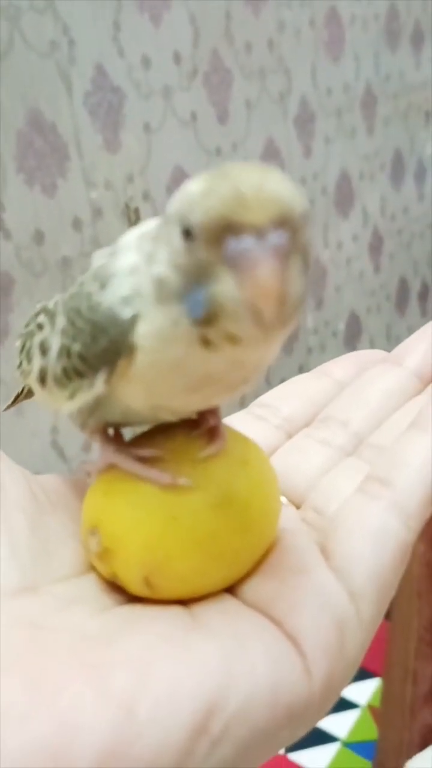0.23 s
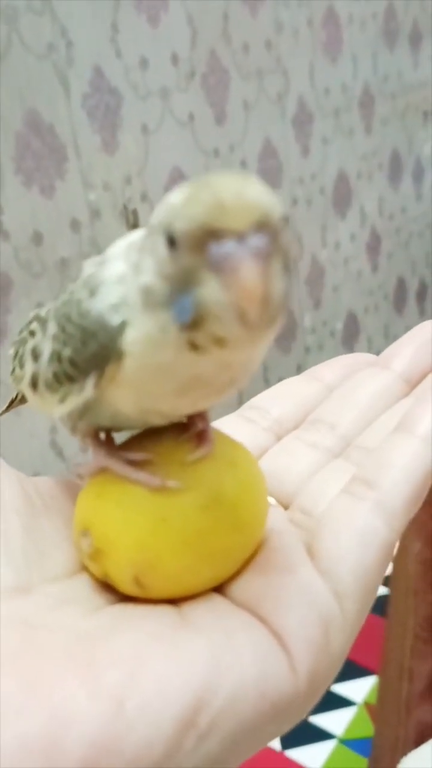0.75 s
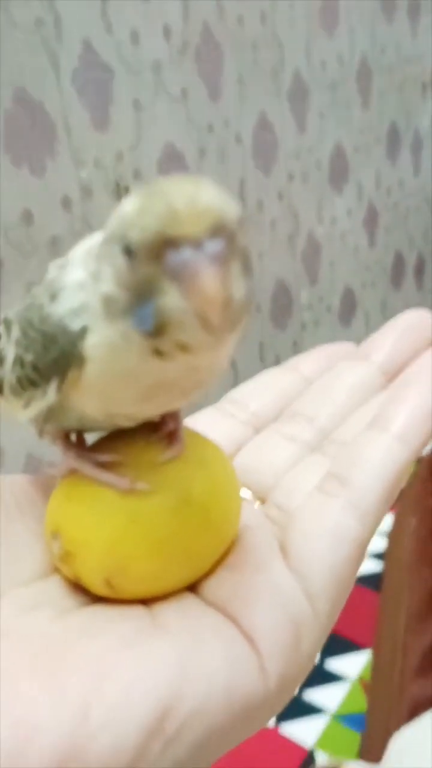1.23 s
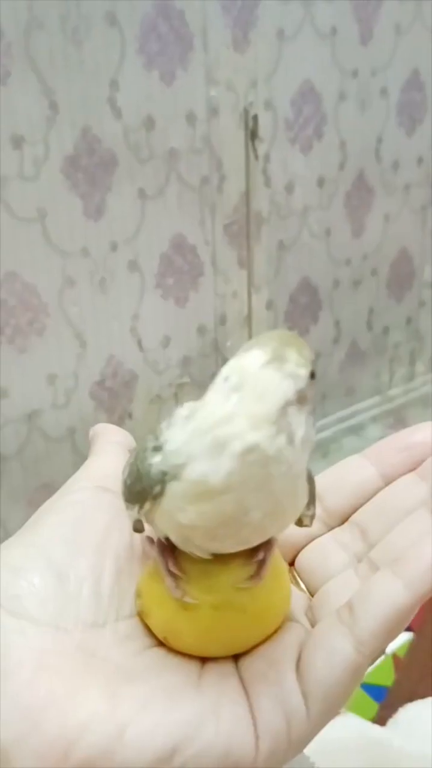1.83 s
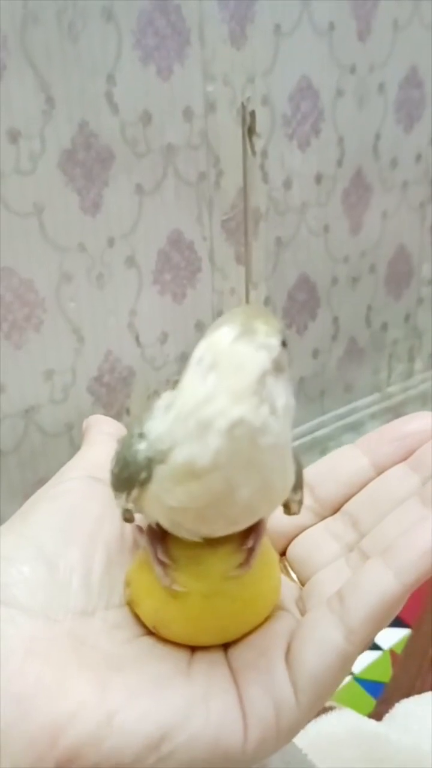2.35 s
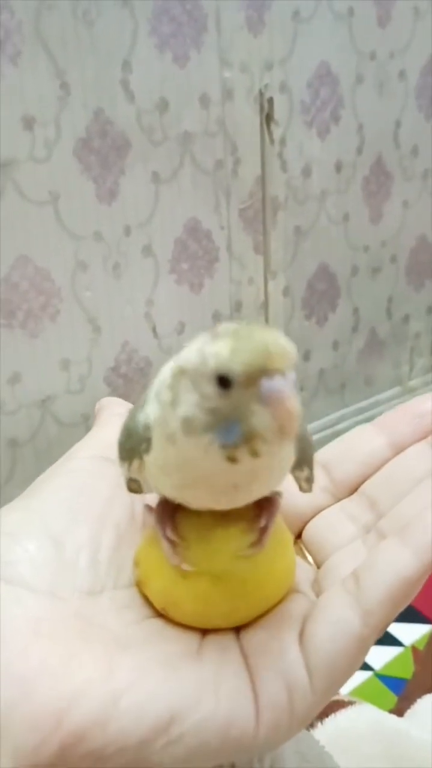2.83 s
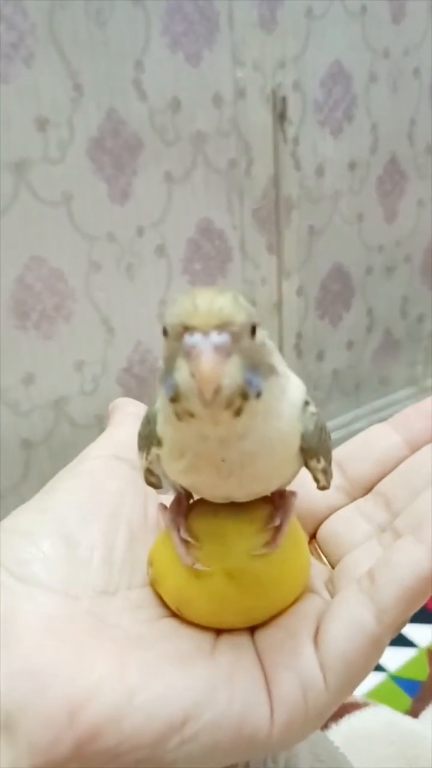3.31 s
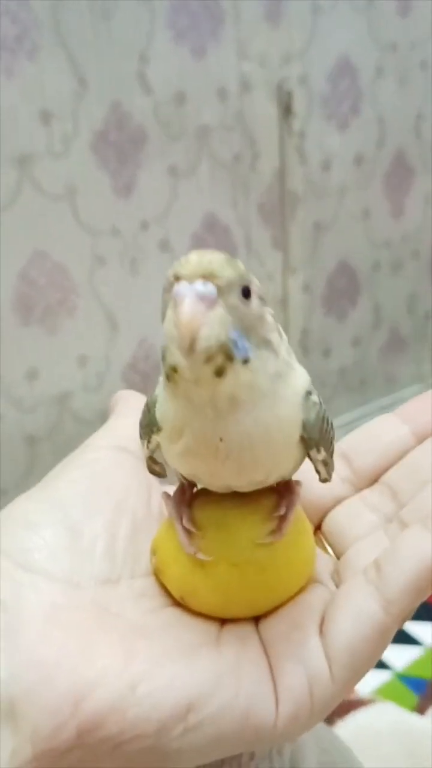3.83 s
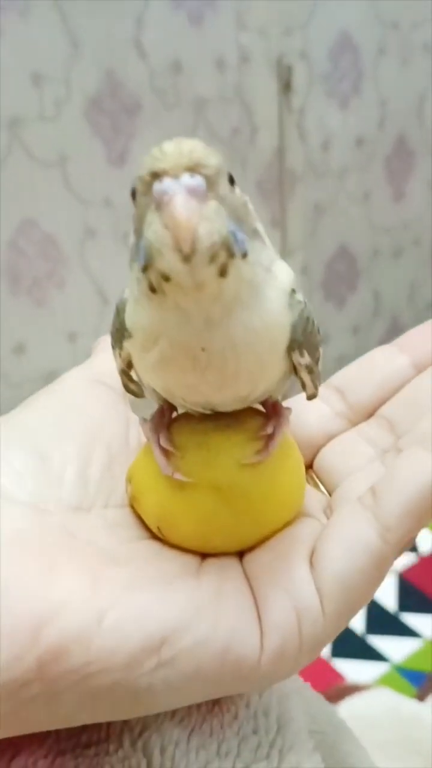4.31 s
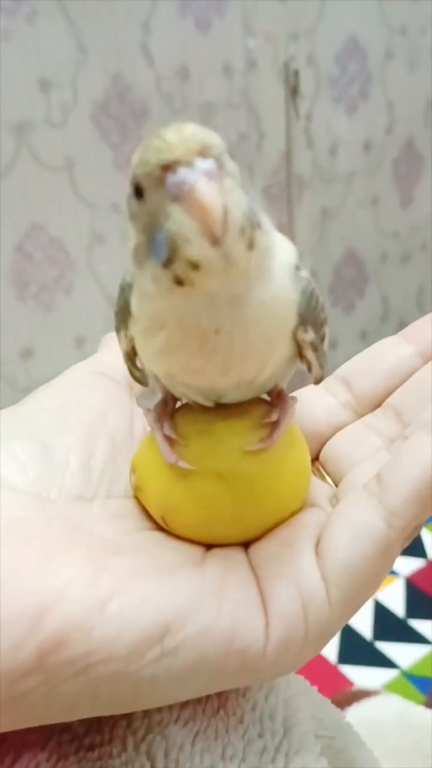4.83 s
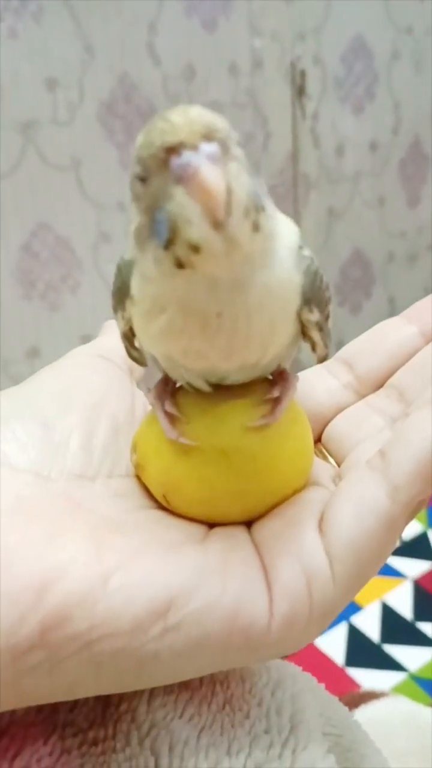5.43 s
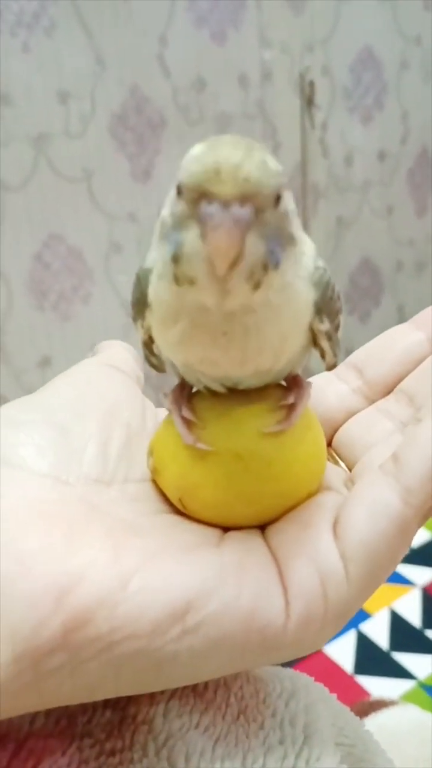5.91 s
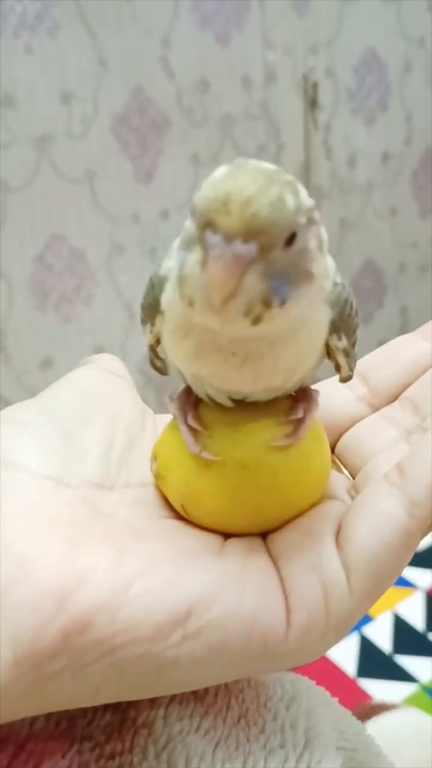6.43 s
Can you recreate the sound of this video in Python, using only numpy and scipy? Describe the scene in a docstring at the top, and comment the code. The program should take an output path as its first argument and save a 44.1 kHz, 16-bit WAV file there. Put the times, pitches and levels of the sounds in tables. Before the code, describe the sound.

A young parakeet gives high, raspy chirps over and over, close up in a small room, with other birds calling faintly further off.

```python
"""A young parakeet on a hand gives ten long raspy chirps close to a phone with two microphone ports. Each is an
unsteady whistle with overtones, half-pitch rasp and breath; a thin 14 kHz hiss sounds while each lasts. Small-
room tone and faint mains buzz run from the start. Birds call further off from 0.3 s. At 1.25 s come a faint
tick and the first of six soft rustles. All sound drops out from 2.8 to 3.1 s. At 4.9 s another bird gives a
nasal squawk; the chirps go on to the end."""
import sys
import numpy as np
from scipy import signal
from scipy.fft import rfft, irfft, next_fast_len
from scipy.io import wavfile
from scipy.ndimage import uniform_filter1d

SR = 44100
rng = np.random.default_rng(int(sys.argv[2]) if len(sys.argv) > 2 else 0)


def store_pcm(level_fs):
    """Save levels as 16-bit WAV."""
    pcm = np.round(np.clip(level_fs, -1, 1) * 32767).astype(np.int16)
    wavfile.write(sys.argv[1], SR, np.atleast_2d(pcm).T)


N = 293706

# Contours, one table a chirp. Each row: time in seconds, left-port whistle in dB, pitch in Hz,
# octave in dB re whistle.
CHIRPS = [
    [(0.0, -18.5, 2876, -9.5), (0.016, -19, 2585, -11.5), (0.03, -20.5, 2980, -8), (0.05, -21, 3040, -6),
     (0.144, -25.5, 3200, -2), (0.194, -18.5, 2968, -11.5), (0.225, -19.5, 3041, -5),
     (0.28, -17, 2930, -14.5)],
    [(0.645, -23.5, 3210, -4), (0.666, -27.5, 3090, -17), (0.714, -23.5, 3076, -9),
     (0.808, -19.5, 2958, -7.5), (0.874, -25, 3180, -4.5), (0.948, -16, 2940, -15),
     (0.97, -18.5, 3082, -12), (0.992, -20, 2856, -24)],
    [(1.43, -35, 3434, -15), (1.488, -24, 3070, -14), (1.525, -24, 2960, -9.5), (1.544, -19.5, 2794, -5.5),
     (1.675, -31.5, 3586, -29.5), (1.689, -27, 3350, -25), (1.732, -24, 3063, -22), (1.805, -26, 3373, -18),
     (1.849, -25.5, 3470, -28), (1.865, -29.5, 3090, -30)],
    [(2.34, -32.5, 3560, -23), (2.361, -35, 3315, -18.5), (2.477, -34.5, 3470, -20.5),
     (2.513, -24, 2960, -19), (2.541, -30.5, 3450, -17), (2.643, -19, 2846, -4), (2.695, -24.5, 3257, -18),
     (2.715, -19.5, 2925, -4), (2.79, -23, 3070, -8.5)],
    [(3.108, -28, 3215, -11), (3.123, -28, 3187, -4), (3.142, -29.5, 3250, -6.5), (3.176, -22.5, 3453, -18),
     (3.192, -22, 3154, -2.5)],
    [(3.485, -32, 3285, -4.5), (3.546, -25, 2998, -18.5), (3.586, -31.5, 3360, -14),
     (3.599, -25, 2997, -11), (3.627, -26.5, 3276, -8.5), (3.697, -27.5, 3193, -8.5),
     (3.774, -24.5, 3340, 1), (3.787, -24.5, 3140, -33), (3.825, -25, 3440, -2)],
    [(4.277, -27.5, 3017, -13), (4.326, -31.5, 3327, -16), (4.344, -24, 2955, -26),
     (4.38, -29.5, 3050, -15), (4.424, -29, 3290, -30), (4.44, -28, 3006, -9), (4.465, -25.5, 3110, -15),
     (4.58, -26.5, 3310, -19.5)],
    [(4.868, -27.5, 3018, -9), (4.953, -26.5, 3102, -11.5), (5.015, -19, 2970, -12), (5.054, -23, 3060, -5),
     (5.107, -23, 3028, -5.5), (5.116, -24.5, 3237, -1.5), (5.163, -25, 3350, -20),
     (5.176, -23.5, 3217, -8.5), (5.197, -22.5, 3350, -23), (5.212, -21.5, 3220, -5.5)],
    [(5.617, -27.5, 3156, -15), (5.664, -27, 3113, -12), (5.68, -22.5, 2974, -16),
     (5.693, -25, 3160, -11.5), (5.734, -17.5, 2634, -9), (5.748, -18.5, 2990, -7.5),
     (5.768, -22.5, 3048, -3.5), (5.849, -24, 3136, -3.5), (5.998, -17, 2953, -11.5)],
    [(6.363, -25.5, 3248, -6.5), (6.383, -23.5, 3083, -16), (6.396, -32, 3390, -15),
     (6.409, -23.5, 3190, -21), (6.442, -24, 3030, -8), (6.556, -21, 3007, -8), (6.592, -23.5, 3137, -9),
     (6.66, -18.5, 3040, -11)],
]
# Voice and head direction per chirp. Each row: base wobble in Hz rms, third partial in dB, rasp in dB
# re whistle, breath and hiss in dB, opening catch, end slide and end burst in dB re whistle,
# left-right in dB, right-port phase of whistle and of octave in radians.
VOICES = [(30, -45.5, -44, -53, -14, -5, -15.5, 3, 2.27, 1.7),
          (44, -49, -51.5, -53.5, -7.5, -13, -15, 1, 2.92, 2.53),
          (73.6, -52.5, -32, -51, 3.5, 1, -23.5, 1, 2.74, 2),
          (86.7, -55, -30.5, -53, -2, -14, -31, 5, 1.8, 1.91),
          (50.9, -53, -49.5, -77, -17, -4, -16, -1, 2.7, 3.12),
          (62, -52.5, -33.5, -58.5, -4, -1, -8.5, 0.5, 2.77, 3.5),
          (67.7, -55.5, -32.5, -59.5, -10, -3.5, -15.5, 1.5, 2.86, 2.37),
          (53, -50.5, -36, -55.5, -18.5, 2.5, -9.5, -0.5, 2.68, 2.4),
          (37.7, -46.5, -36, -56.5, -7, -1.5, -16, 3.5, 2.25, 1.76),
          (44.1, -50.5, -62, -57.5, -1, 2, -61, 2, 3.02, 2.2)]
# Largest voice slips. Each row: time in seconds, pitch jump in Hz, level change in dB.
SLIPS = [(0.105, -152, 1), (0.679, 374, -2), (0.839, 170.5, -2.5), (0.919, 206, -3), (0.968, 237.5, -5.5),
         (1.468, 188, -20), (1.521, 225, -10), (1.747, 304, -5), (1.799, -250, 4.5), (2.374, 345, 5.5),
         (2.394, 329.5, 7), (2.417, 221, -5), (2.467, -400, 4), (2.489, -339, 5.5), (2.546, -275, 6),
         (2.612, 249, 1), (2.66, 208, -4), (2.691, -435, 6.5), (2.707, -256, 2.5), (2.75, 190, -4),
         (2.774, -178, 3.5), (3.117, -215, 6), (3.187, 82, -12.5), (3.515, 340, 0), (3.533, 285, -3),
         (3.612, 183, -10), (3.697, -208, 2), (3.745, -242, 4), (3.765, -214, 2), (3.784, -248, 9.5),
         (4.313, -145, 0.5), (4.357, 153, -1), (4.38, 145, -1.5), (4.418, -222, 3), (4.464, 209, -3),
         (4.496, 196, 0), (4.542, 224, 1), (4.912, -298, -2), (5.664, 162, -2), (5.927, -102, 3.5),
         (6.557, 182, -5), (6.609, 139, 1)]
# An echo off the hand shades the ports. Each row: pitch in Hz, left-right change in dB.
HAND_SHADE = [(2600, 11), (2775, 11), (2925, 6.5), (3075, 2.5), (3225, -1.5), (3375, -4.5), (3550, -2.5)]
# Same echo. Each row: pitch in Hz, right-port phase change in radians.
HAND_PHASE = [(2600, -0.15), (2775, -0.13), (2925, 0.25), (3075, -0.05), (3225, -0.057), (3375, -0.23),
              (3550, 0.85)]
# Distant calls. Each row: start and length in seconds, peak position 0-1, peak in dB,
# first pitch, last pitch and smear in Hz, left-right in dB.
FAR_CALLS = [(0.328, 0.098, 0.2, -57, 4450, 4250, 400, -1), (0.421, 0.17, 0.03, -57, 3270, 3100, 487, -1),
             (1.251, .2, 0.68, -45.5, 1770, 2797, 350, -2), (1.249, 0.25, 0.67, -59, 1662, 1730, 200, -13),
             (2.11, 0.13, 0.14, -57.5, 2043, 1817, 132, -6), (2.172, 0.071, 0.43, -62, 1363, 1350, 100, -8),
             (3.295, 0.19, 0.78, -54, 3860, 3760, 135, 0), (3.357, 0.17, 0.56, -53, 4970, 4940, 710, 1),
             (3.857, 0.32, 0.25, -48.5, 4130, 4140, 454, -1),
             (3.87, 0.35, 0.42, -47.5, 4770, 4850, 239.4, 0.5), (4.031, 0.42, .1, -60.5, 1860, 1866, 60, 0),
             (4.203, 0.23, 0.7, -55, 1865, 1940, 80, 0), (4.203, .1, 0.82, -50, 2006, 2660, 274, 0),
             (5.258, 0.13, .5, -62.5, 2510, 2380, 80, 1), (5.337, 0.14, 0.23, -71, 2133, 2140, 60, -20)]
# Squawk contour. Each row: time in seconds, level in dB, pitch in Hz.
SQUAWK = [(4.875, -82, 1225), (4.894, -32.5, 1209), (4.924, -37, 1228), (4.945, -44.5, 1223),
          (5.022, -42.5, 1197), (5.07, -53.5, 1152)]
# Squawk harmonics. Each row: pitch multiple, gain in dB.
SQUAWK_PARTIALS = [(1, -1), (2, 3), (3, -10), (4, -8.5)]
# Rustles. Each row: start and length in seconds, midpoint level in dB.
RUSTLES = [(1.257, 0.26, -46.5), (2.1, 0.19, -82), (3.372, 0.15, -58.5), (3.85, 0.27, -65.5),
           (4.183, 0.105, -57), (5.244, .2, -77)]
# Mains overtones. Each row: frequency in Hz, level in dB rms.
BUZZ = [(100.7, -76.5), (201.4, -77.5), (906, -80), (1007, -70.5), (1108, -81), (1611, -76), (1712, -85.5),
        (1913, -92), (2014, -79.5)]
# Breath, plus a thin 14 kHz hiss during the chirps. Each row: frequency in Hz, relative density in dB.
BREATH_AND_HISS_SPECTRUM = [(30, -10.5), (100, 1), (500, 2), (900, -4.5), (2000, 1), (3500, -8.5),
                            (4600, -30), (7600, -25), (11000, -29.5), (14200, -13.5)]
# Other noise spectra. Each row: frequency in Hz, relative density in dB.
HOARSE_SPECTRUM = [(300, -27.5), (1200, -15.5), (2200, -2), (3300, -6), (4200, -13.5), (5800, 2),
                   (7500, -11.5), (14000, -23)]
RUSTLE_SPECTRUM = [(300, -7), (1500, -10), (3000, 3.5), (6000, -21), (9000, -13), (14000, -39)]
ROOM_TONE_SPECTRUM = [(15, -52), (25, -6), (317, -20), (500, -14.5), (766, -23), (1000, -21.5),
                      (1500, -21.5), (1660, -17.5), (2420, -22.5), (3520, -22), (4600, -29), (13800, -38),
                      (14900, -31)]
# Noise likeness at the two ports. Each row: frequency in Hz, correlation 0-1.
PORT_LIKENESS = [(60, 0.32), (300, 0.345), (700, 0.44), (1400, 0.0057), (14000, 0.013)]
# Room decay. Each row: frequency in Hz, T60 in seconds.
ROOM_T60 = [(1000, 0.1), (2800, 0.25), (6000, .24), (9000, .25), (14000, 0.1)]

EASY_HZ = 3100  # the voice strains above this pitch
WOBBLE_PER_HZ, WOBBLE_MIN_HZ = .13, 24.2
RASP_DB_PER_HZ, RASP_EDGE_DB, RASP_EDGE_S = .0352, 13.5, .032
CATCH_HZ, CATCH_S, CATCH_RISE_S = 3950, .0089, .011
SLIDE_HZ, SLIDE_S = 880, .00902
SLIP_WIDTH_S, SLIP_GAP_S, SLIP_HZ, SLIP_DB = .0031, .024, 85, 1.5
TRAIL_DB, TRAIL_DB_PER_S = -16.5, 220
BREATH_SWELL_DB, BREATH_HOLD_S, BREATH_DB_PER_S = 2.5, .033, 891
PORT_DELAY_SAMPLES = 11  # the right port hears the parakeet later
DROPOUT_START_S, DROPOUT_END_S, CUTOFF_HZ = 2.7868, 3.1005, 14850


def parakeet():
    """All chirps with their breath, hoarse air and room echoes, plus a thin hiss that sounds with them."""
    voice, air = np.zeros((2, N)), np.zeros((2, N))
    for contour, traits in zip(CHIRPS, VOICES):
        start_s, ports, air_gains = chirp(contour, *traits)
        add(voice, start_s, ports)
        add(air, start_s, air_gains)
    near = voice + air[0] * hiss(BREATH_AND_HISS_SPECTRUM, patchy_db=4)
    near += air[1] * hiss(HOARSE_SPECTRUM, patchy_db=4)
    return near + amp(-16) * room(near)


def chirp(contour, wobble_hz, third_db, rasp_db, breath_db, catch_db, slide_db, burst_db,
          pan_db, whistle_rad, octave_rad):
    """One unsteady whistle, roughened by strain. Returns start time, both ports and two noise gains."""
    times_s, *columns = np.transpose(contour)
    start_s, end_s = times_s[0], times_s[-1]
    t = np.arange(start_s - .03, end_s + .16, 1 / SR)
    db, hz, octave_db = (np.interp(t, times_s, c) for c in columns)
    strain_hz, effort_db = hz - EASY_HZ, db - db.mean()
    wobble_hz = np.maximum(wobble_hz + WOBBLE_PER_HZ * strain_hz, WOBBLE_MIN_HZ)
    rough = np.clip(wobble_hz / 120, 0, 1)
    third_db = third_db + effort_db - db - 25 * (t < start_s)  # now re whistle
    burst = amp(db[-1] + burst_db) * end_burst(t - end_s)

    # The voice catches on a thin high note, and slides down as the air runs out.
    before = np.clip((start_s - t) / .0044, 0, 1)
    after = np.clip((t - end_s) / SLIDE_S, 0, 3)
    hz += before * (CATCH_HZ + 120 * wander(len(t), 51, 310) - hz)
    hz -= SLIDE_HZ * np.minimum(after, 1) ** 1.545
    db += before * (catch_db - 30 * np.clip((start_s - CATCH_S - t) / CATCH_RISE_S, 0, 2))
    db += slide_db * np.minimum(4 * after, 1) - 14 * after ** 3

    slip_hz, slip_db = slips(t, start_s, end_s, strain_hz)
    tremor_hz = wobble_hz * wander(len(t), 42.3, 145)
    slip_db -= 2 * np.tanh(tremor_hz / 120)  # the whistle sounds quieter on upward pitch swings
    sag_db = -(1 + 3 * rough) * (wander(len(t), 41.1, 158) ** 2 - .4) / 2

    # Spells of strong-weak beating in the folds fill in the half-pitch lines.
    to_edge_s = np.maximum(np.minimum(t - start_s, end_s - t), 0)
    rasp_db += RASP_DB_PER_HZ * strain_hz + RASP_EDGE_DB * np.exp(-to_edge_s / RASP_EDGE_S)
    rasp_db += 3 * wander(len(t), 9.3, 48) - 30 * before
    # Each row: multiple, gain in dB, right-port phase in radians, flutter in dB, smear in radians.
    partials = [(1, .008, whistle_rad, -1, .048),
                (2, octave_db - 30 * before ** .54, octave_rad, 3.5, .2),
                (3, third_db, -2, 1, .8),
                (4, third_db - 7.5, .04, -1.5, .8),
                (.5, rasp_db - 10, 2.5, -4.5, .68),
                (1.5, rasp_db - .5, 4, 1.5, .92),
                (2.2, rasp_db - 12.5, 2.74, 5.5, .57)]
    ports = whistle(hz + slip_hz + tremor_hz, db + sag_db + slip_db, partials, rough, pan_db)

    puff = amp(breath_db + .45 * effort_db) * breath(t, start_s, end_s, before, after)
    hoarse = amp(db - 49 + 20 * rough)  # an unsteady voice leaks air
    gusts = amp(2 * wander(len(t), 15, 149.8))
    fade = np.clip(np.minimum(t - t[0], t[-1] - t) / .0016, 0, 1)
    return t[0], ports * fade, np.array([puff, burst + hoarse]) * fade * gusts


def whistle(hz, db, partials, rough, pan_db):
    """Fluttering partials, each with its own level and phase at the two ports."""
    count = len(hz)
    ports = np.zeros((2, count))
    cycle_rad = 2 * np.pi * np.cumsum(hz) / SR
    delay_rad = 2 * np.pi * EASY_HZ * PORT_DELAY_SAMPLES / SR
    smooth_hz = uniform_filter1d(hz, size=260)  # the port shading follows the smoothed pitch
    for multiple, gain_db, right_rad, flutter_db, smear_rad in partials:
        level_db = db + gain_db + flutter_db * wander(count, 17, 152)
        phase = multiple * cycle_rad + (smear_rad + .17 * rough) * wander(count, 80, 400)
        offset_rad = right_rad + multiple * delay_rad + at_hz(HAND_PHASE, smooth_hz)
        offset_rad += (.04 + 1.5 * smear_rad) * wander(count, 1.3, 60)
        shade_db = pan_db + at_hz(HAND_SHADE, smooth_hz) if multiple == 1 else 2.5
        ports[0] += amp(level_db) * np.cos(phase)
        ports[1] += amp(level_db - shade_db) * np.cos(phase + offset_rad)
    ports[1] = np.roll(ports[1], PORT_DELAY_SAMPLES)
    return np.sqrt(2) * ports


def slips(t, start_s, end_s, strain_hz):
    """Quick slips in Hz and dB: the listed ones, plus random ones that jump more under strain."""
    gap, jump, change = rng.standard_normal((30, 3)).T
    at_s = start_s + SLIP_GAP_S * np.cumsum(np.exp(.5 * gap))
    jump *= np.clip(1 + np.interp(at_s, t, strain_hz) / 400, .5, 2)
    small = np.transpose([at_s, SLIP_HZ * jump, SLIP_DB * change])
    inside = [row for row in SLIPS + list(small) if start_s < row[0] < end_s]
    at_s, jump_hz, change_db = np.transpose(inside)
    bumps = np.exp(-.5 * ((t[:, None] - at_s) / SLIP_WIDTH_S) ** 2)
    return bumps @ jump_hz, bumps @ change_db


def breath(t, start_s, end_s, before, after):
    """Gain of breath and thin hiss: grows through a chirp, then stops quickly."""
    progress = np.clip((t - start_s) / (end_s - start_s), 0, 1)
    onset_db = -170 * before * (start_s - t)
    stop_db = -after - BREATH_DB_PER_S * np.maximum(t - end_s - BREATH_HOLD_S, 0)
    return amp(2.5 + BREATH_SWELL_DB * (progress - .5) + onset_db + stop_db)


def end_burst(past_end_s):
    """Gain of the hoarse air that ends a chirp and trails off."""
    pulse = np.exp(-((past_end_s - .003) / .018) ** 2)
    trail = (past_end_s > 0) * amp(TRAIL_DB - TRAIL_DB_PER_S * past_end_s)
    return np.maximum(pulse, trail)


def squawk():
    """Short wavering harmonic stack, nearer the right port."""
    times_s, db, hz = np.transpose(SQUAWK)
    t = np.arange(times_s[0], times_s[-1], 1 / SR)
    cycle_rad = 2 * np.pi * np.cumsum(np.interp(t, times_s, hz) + 22 * wander(len(t), 13, 126)) / SR
    smear_rad = np.clip((t - times_s[0] - .04) / .05, .05, .4)  # clear, then rough
    lag_rad, port_db = np.array([[0], [1.7]]), np.array([[0], [4.5]])
    stack, out = np.zeros((2, len(t))), np.zeros((2, N))
    for multiple, gain_db in SQUAWK_PARTIALS:
        gain = amp(gain_db + 2 * wander(len(t), 11, 150))
        stack += gain * np.cos(multiple * cycle_rad - lag_rad + smear_rad * wander(len(t), 30, 244))
    add(out, times_s[0], amp(np.interp(t, times_s, db) + port_db) * stack)
    return out + amp(-10) * room(out)


def far_birds():
    """Calls blurred by distance: gliding narrow noise, independent at each port."""
    out = np.zeros((2, N))
    for start_s, length_s, top, peak_db, from_hz, to_hz, smear_hz, pan_db in FAR_CALLS:
        progress = np.arange(0, length_s, 1 / SR) / length_s
        count = len(progress)
        db = peak_db + np.interp(progress, [0, top, 1], [-16.5 * top, 0, -20.5 * (1 - top)])
        phase = 2 * np.pi * np.cumsum(from_hz + (to_hz - from_hz) * progress) / SR
        blur = [wander(count, .77, smear_hz) * np.cos(phase)
                + wander(count, .69, smear_hz) * np.sin(phase) for _ in "LR"]
        gain = amp(db + np.array([[.5], [-.5]]) * pan_db)
        add(out, start_s, gain * blur * signal.windows.tukey(count, .35))
    return out + amp(1) * room(out)


def tick(start_s=1.251, peak_db=-40.5, hz=10000, t60_s=.0023):
    """One faint bright click: a damped sine."""
    t, out = np.arange(200) / SR, np.zeros((2, N))
    add(out, start_s, amp(peak_db - 60 * t / t60_s) * np.sin(2 * np.pi * hz * t))
    return out


def rustles(swell_db=13):
    """Soft wideband rustles between chirps, each swelling."""
    gain = np.zeros(N)
    for start_s, length_s, db in RUSTLES:
        progress = np.arange(0, length_s, 1 / SR) / length_s
        swell = amp(db + swell_db * (progress - .5))
        add(gain, start_s, swell * signal.windows.tukey(len(swell), .3))
    return gain * hiss(RUSTLE_SPECTRUM, patchy_db=8)


def buzz(waver_db=1.5):
    """Wavering mains overtones, the upper ones stronger at the right port."""
    t, out = np.arange(N) / SR, np.zeros((2, N))
    lag_rad, port_db = np.array([[0], [1.4]]), np.array([[-3.5], [4.5]])
    waver = wander(2 * N, .95, 10)
    for (hz, db), (phase_skip, level_skip) in zip(BUZZ, rng.integers(0, N, (len(BUZZ), 2))):
        phase = 2 * np.pi * hz * t + phase_skip + .5 * waver[phase_skip:][:N]
        treble = min(hz / 1000, 1)
        gain = np.sqrt(2) * amp(db + waver_db * waver[level_skip:][:N] + treble * port_db)
        out += gain * np.cos(phase - treble * lag_rad)
    return out


def room_tone(rms_db=-64.5):
    """Faint, bass-heavy background noise."""
    return amp(rms_db) * hiss(ROOM_TONE_SPECTRUM, patchy_db=3.5)


def room(x):
    """Sparse echoes of random sign, separate per port; each band decays at its own rate."""
    taps = np.zeros((2, SR // 2))
    at = np.arange(100, SR // 2 - 20, 20) + rng.integers(0, 20, (2, (SR // 2 - 101) // 20))
    np.put_along_axis(taps, at, rng.choice([-1., 1.], at.shape), 1)
    hz, t, bands = signal.stft(taps, SR, nperseg=128)
    tail = signal.istft(bands * amp(-60 * t / at_hz(ROOM_T60, hz)[:, None]), SR, nperseg=128)[1]
    return signal.fftconvolve(x, tail / np.linalg.norm(tail[0]), axes=1)[:, :N]


def hiss(spectrum, patchy_db):
    """Two-port noise of rms 1 with drifting patches."""
    frames, hz = N // 128 + 5, np.fft.rfftfreq(512, 1 / SR)
    a, b, c, d, patches = rng.standard_normal((frames, 257, 5)).T
    patches = unit_rms(uniform_filter1d(uniform_filter1d(patches, 5, axis=0), 16, axis=1))
    likeness = at_hz(PORT_LIKENESS, hz)[:, None]
    left = a + 1j * b
    right = likeness * left + np.sqrt(1 - likeness ** 2) * (c + 1j * d)
    bands = np.array([left, right]) * amp(at_hz(spectrum, hz)[:, None] + patchy_db * patches)
    return unit_rms(signal.istft(bands, nperseg=512, noverlap=384)[1][:, :N])


def wander(count, lo_hz, hi_hz):
    """Random drift of rms 1 between two rates."""
    size = next_fast_len(count)
    hz = np.fft.rfftfreq(size, 1 / SR)
    shape = hz / np.sqrt(hz ** 2 + lo_hz ** 2) / (1 + (hz / hi_hz) ** 4)
    return unit_rms(irfft(rfft(rng.standard_normal(size)) * shape, size)[:count])


def amp(db):
    """dB to gain."""
    return 10 ** (np.asarray(db) / 20)


def unit_rms(x):
    """Scales to rms 1."""
    return x / np.sqrt(np.mean(np.abs(x) ** 2) + 1e-20)


def at_hz(table, hz):
    """Interpolates on a log-frequency axis."""
    table_hz, values = np.transpose(table)
    return np.interp(np.log(hz + 1), np.log(table_hz + 1), values)


def add(mix, start_s, sound):
    """Mixes a sound in, cropped to the mix."""
    at = round(start_s * SR)
    sound = sound[..., max(-at, 0):]
    part = mix[..., max(at, 0):][..., :sound.shape[-1]]
    part += sound[..., :part.shape[-1]]


def scene():
    """All sources at the two ports."""
    return parakeet() + far_birds() + squawk() + buzz() + tick() + rustles() + room_tone()


def record(dry):
    """One dropout with short fades, then the band limit."""
    t = np.arange(N) / SR
    gate = np.clip(np.maximum((DROPOUT_START_S - t) / .00293, (t - DROPOUT_END_S) / .03), 0, 1)
    lowpass = signal.firwin(511, CUTOFF_HZ, window=("kaiser", 9), fs=SR)
    return signal.oaconvolve(dry * gate, lowpass[None], "same")


dry = scene()
out = record(dry)
store_pcm(out)
```